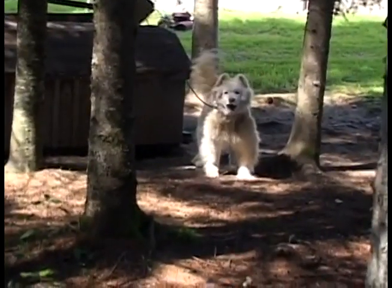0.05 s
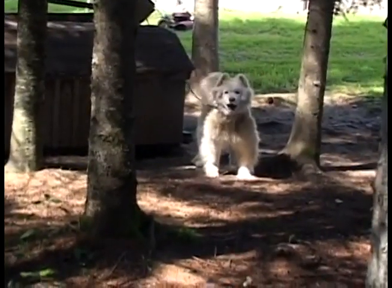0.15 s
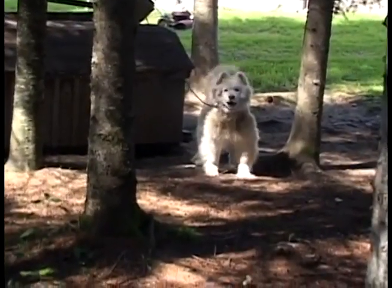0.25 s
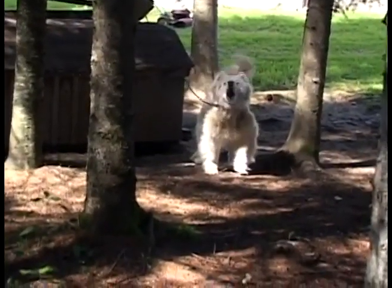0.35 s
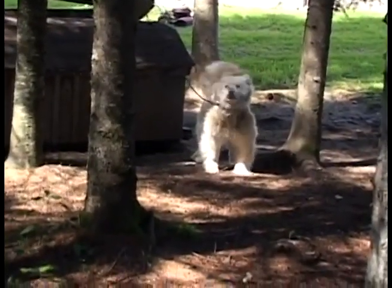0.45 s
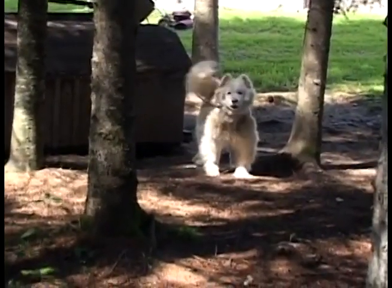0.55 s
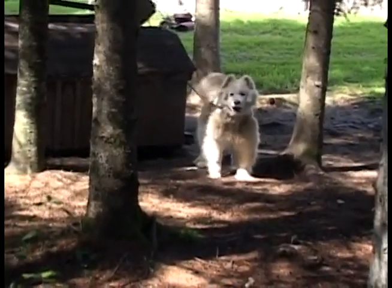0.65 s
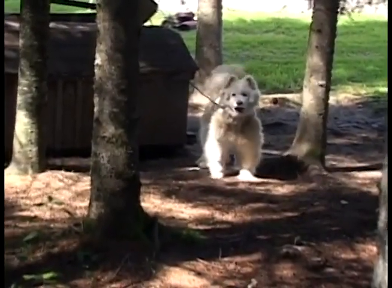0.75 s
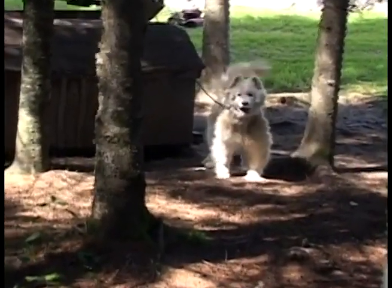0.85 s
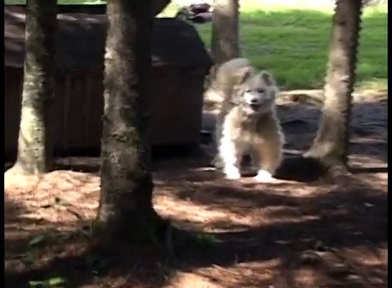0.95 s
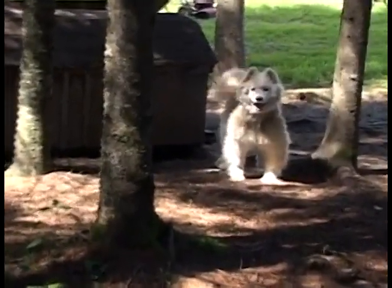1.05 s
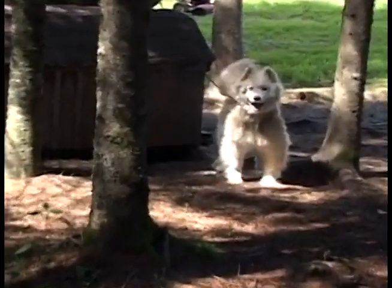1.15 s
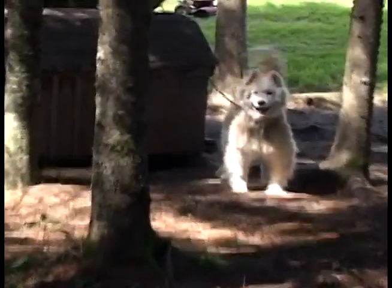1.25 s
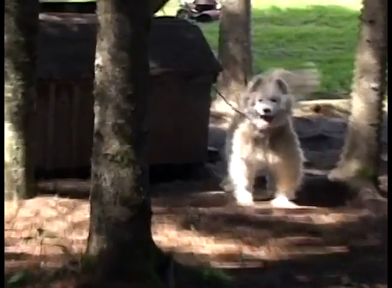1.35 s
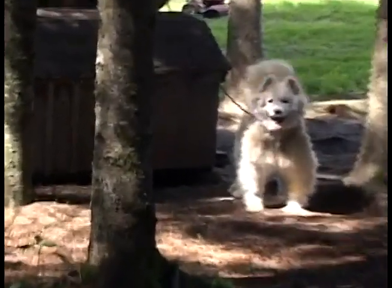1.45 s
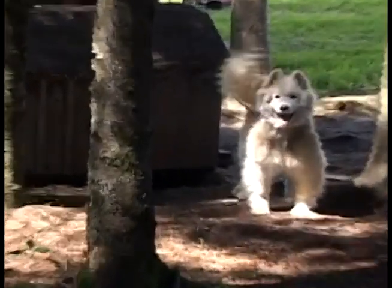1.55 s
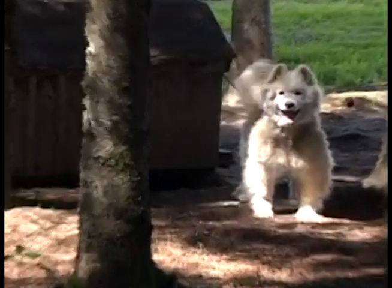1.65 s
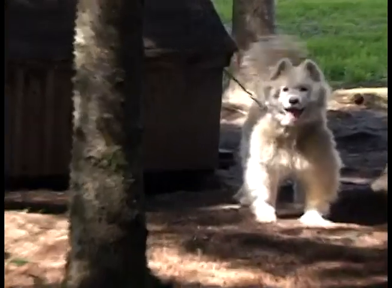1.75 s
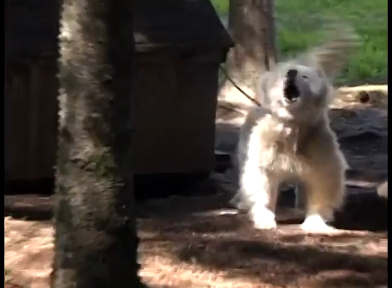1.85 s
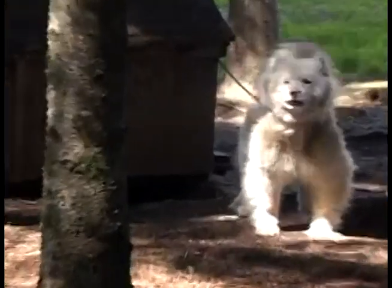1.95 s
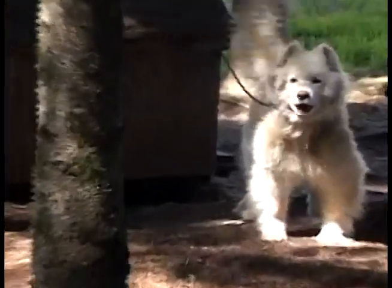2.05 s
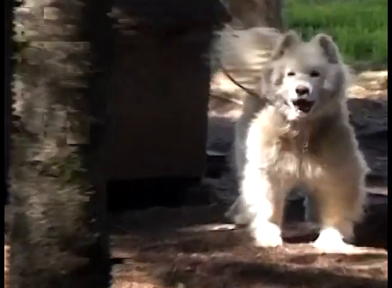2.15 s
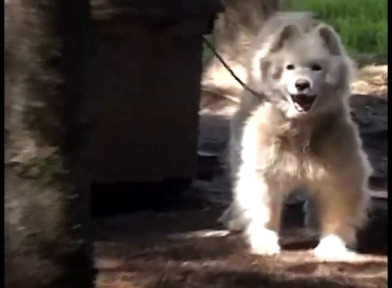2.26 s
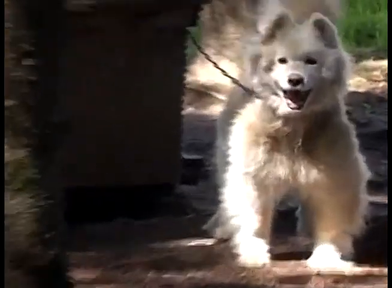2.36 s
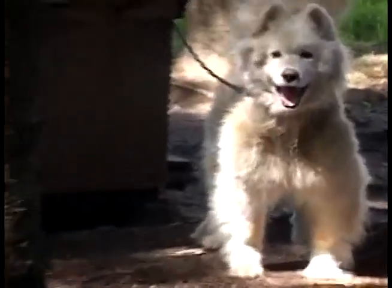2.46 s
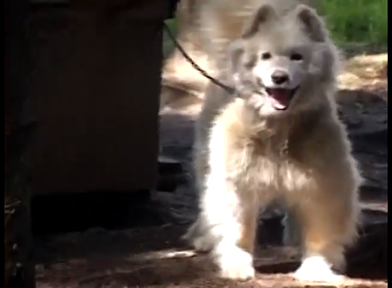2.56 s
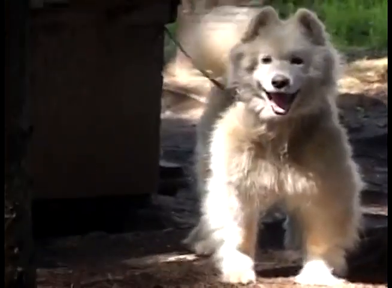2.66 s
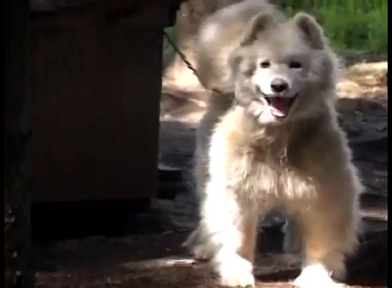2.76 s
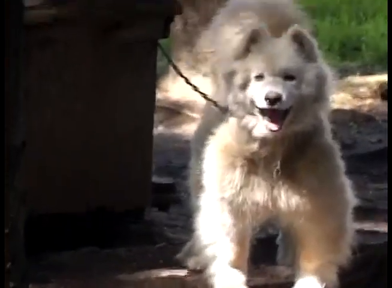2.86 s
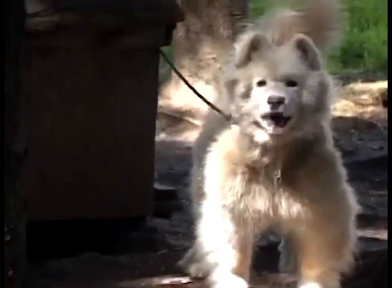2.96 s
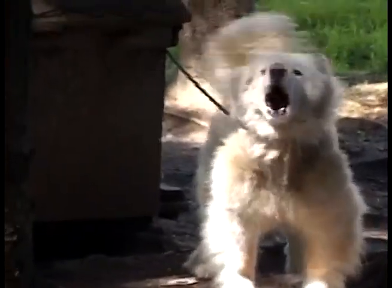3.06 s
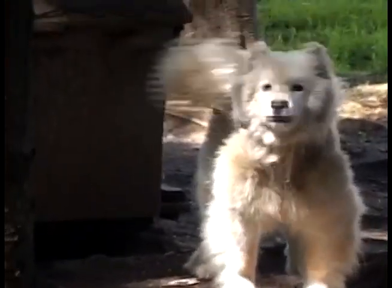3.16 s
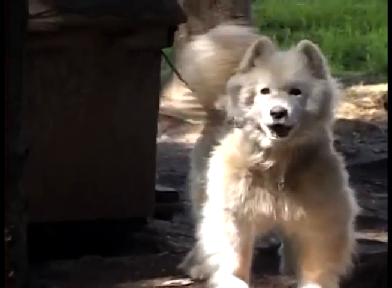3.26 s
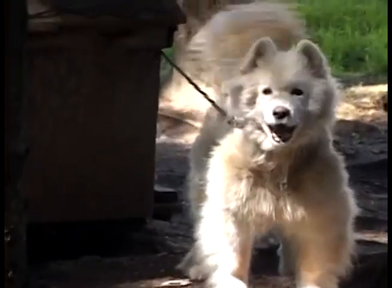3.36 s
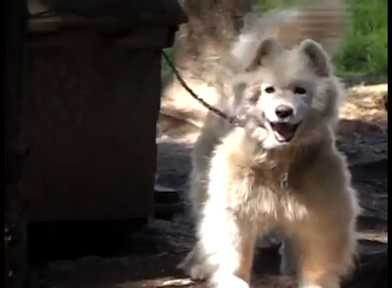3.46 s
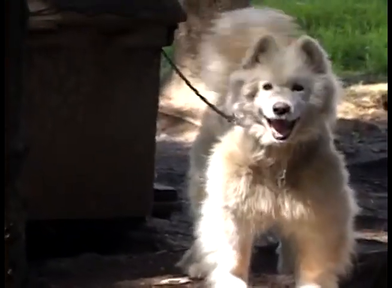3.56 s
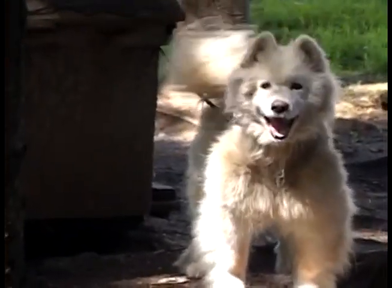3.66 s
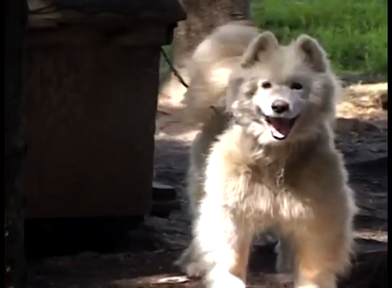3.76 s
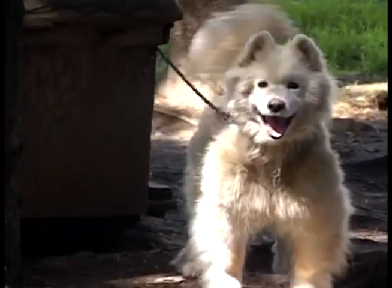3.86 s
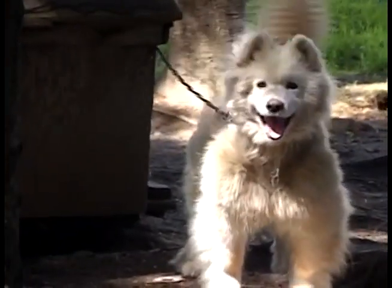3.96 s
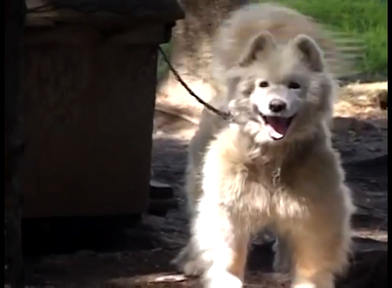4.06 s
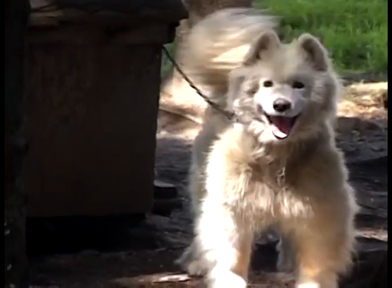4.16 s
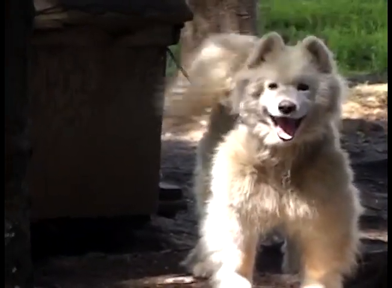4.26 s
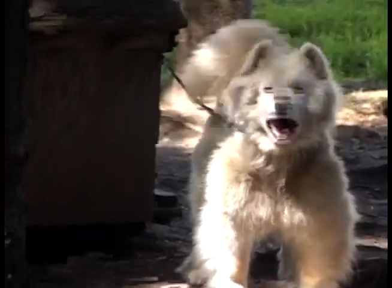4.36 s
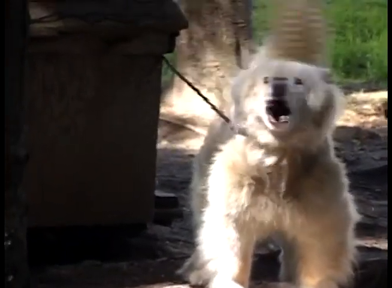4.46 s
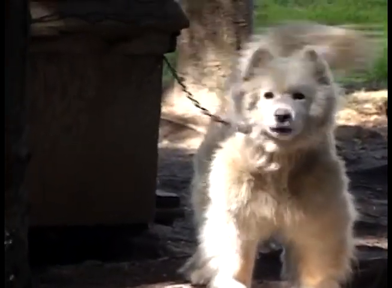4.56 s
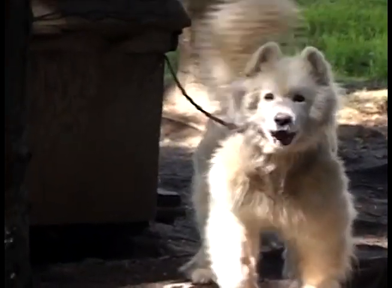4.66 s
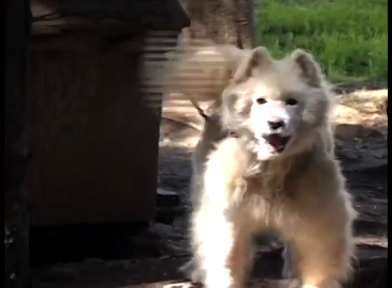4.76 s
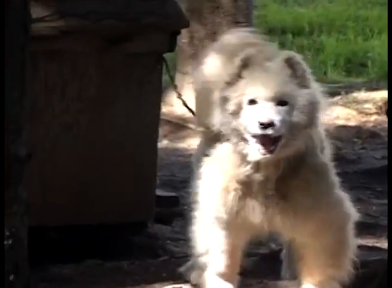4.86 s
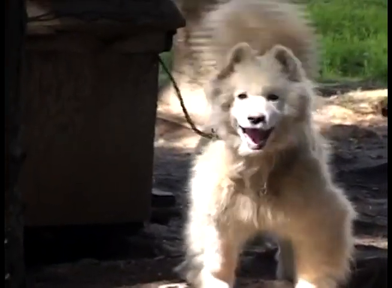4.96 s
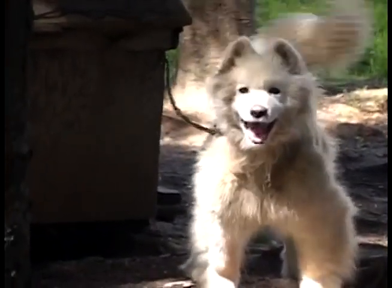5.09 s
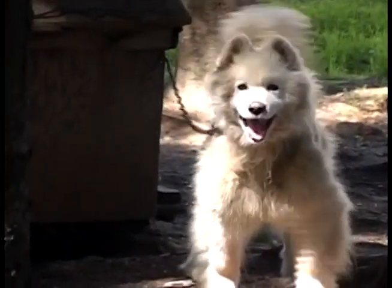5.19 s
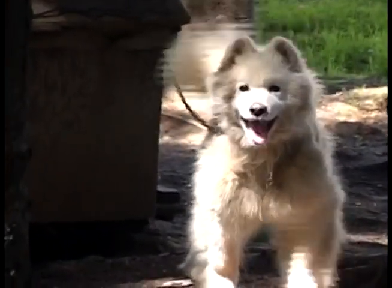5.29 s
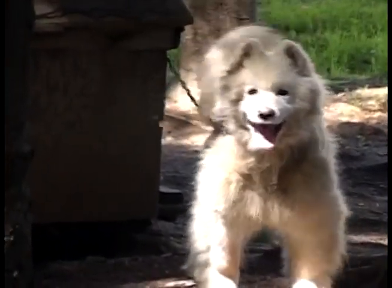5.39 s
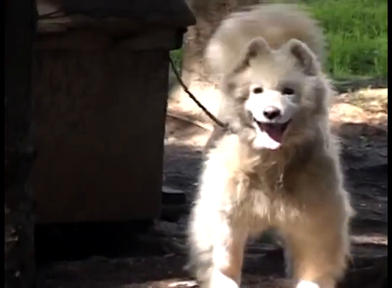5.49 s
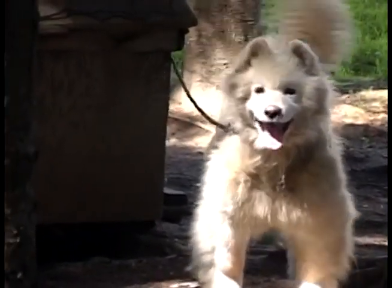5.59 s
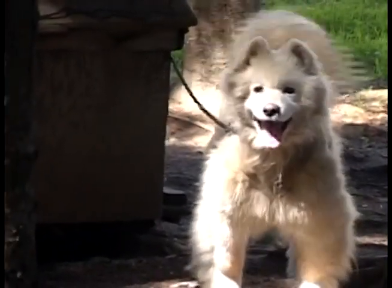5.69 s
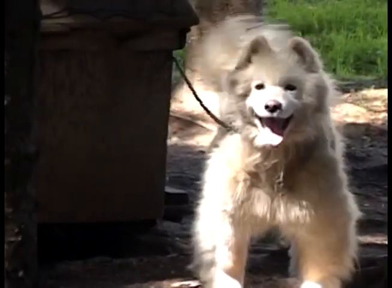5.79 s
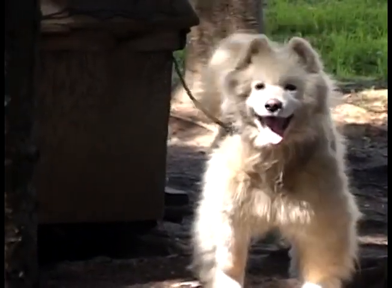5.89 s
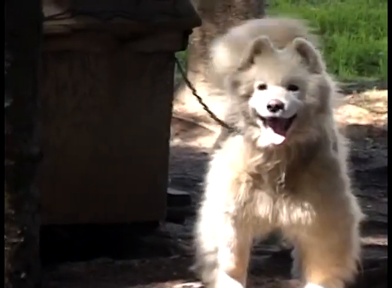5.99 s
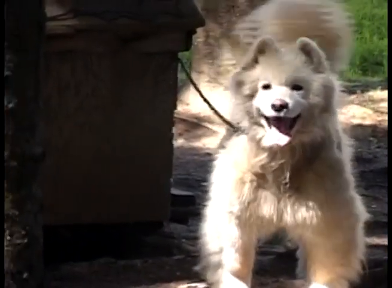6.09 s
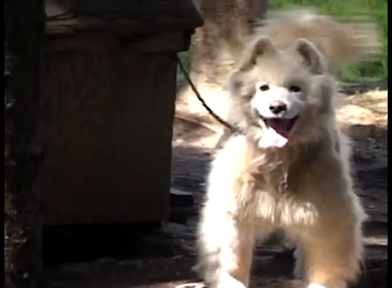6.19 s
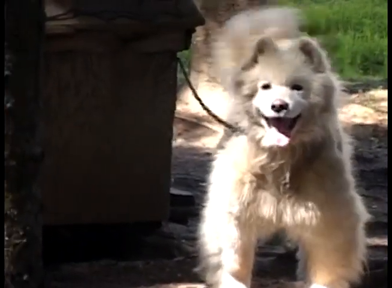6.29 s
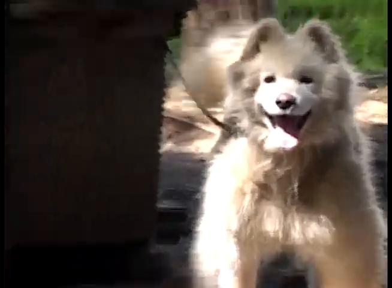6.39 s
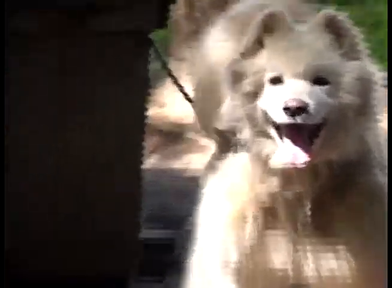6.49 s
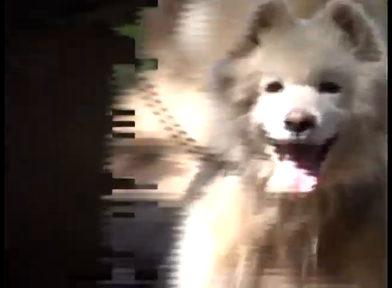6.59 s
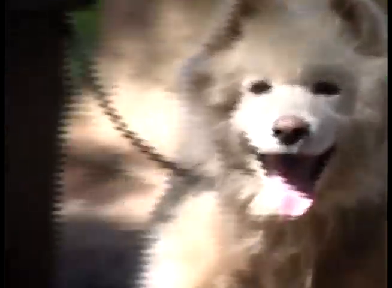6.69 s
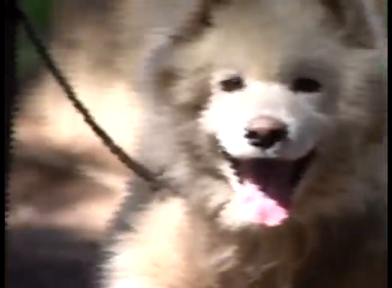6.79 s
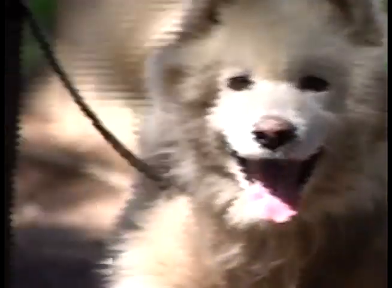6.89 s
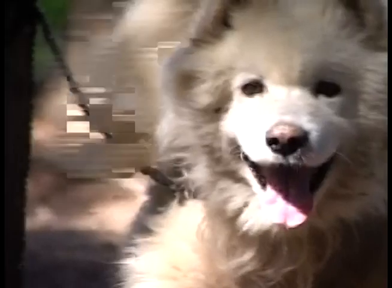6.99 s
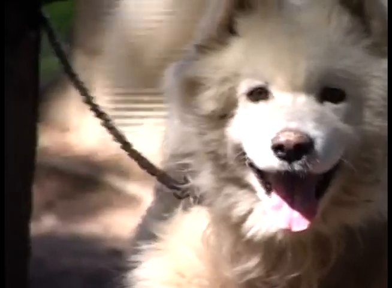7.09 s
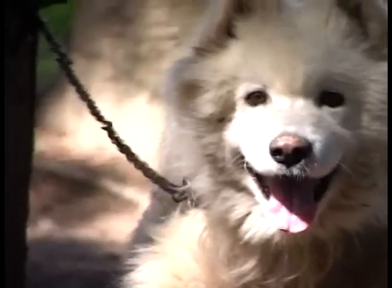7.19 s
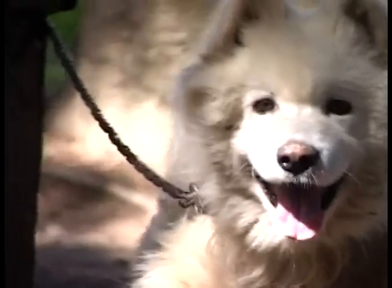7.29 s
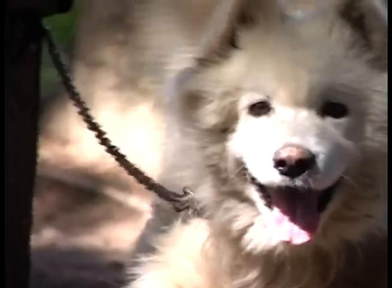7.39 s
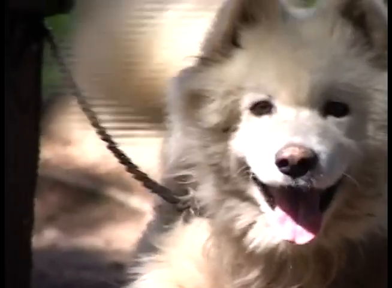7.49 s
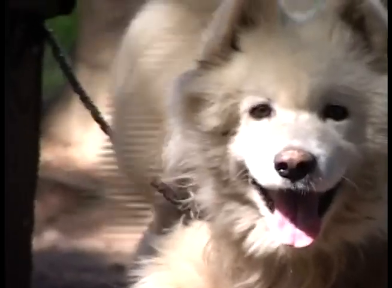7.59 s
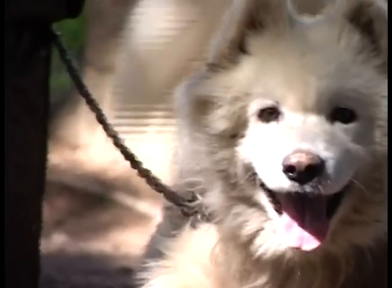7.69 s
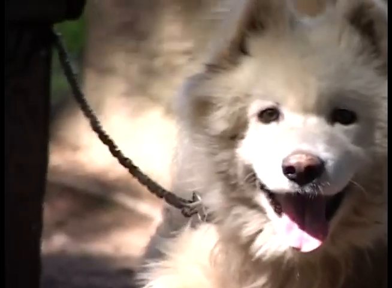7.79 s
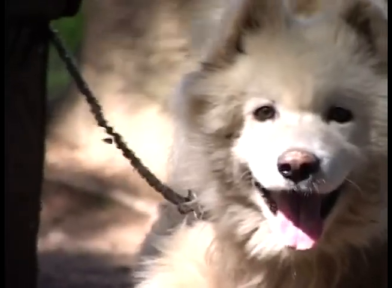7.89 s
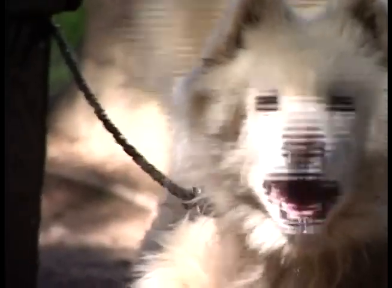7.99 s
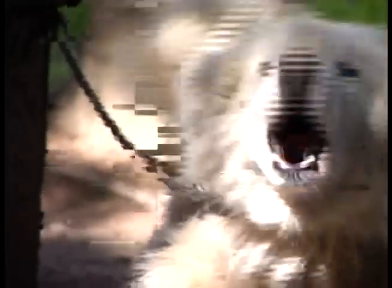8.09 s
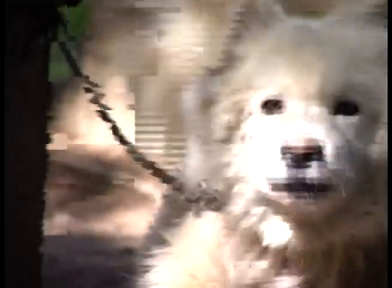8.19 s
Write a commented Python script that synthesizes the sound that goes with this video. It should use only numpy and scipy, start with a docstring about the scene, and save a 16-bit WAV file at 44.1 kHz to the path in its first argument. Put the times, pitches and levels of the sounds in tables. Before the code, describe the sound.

A quiet outdoor yard opens with nearly still air, a faint low hum from a far machine and the dying echo of an earlier bark. Around 0.3 seconds a very faint high swish passes. At 0.4 a large dog barks: short, loud, rough and hoarse, starting with a tiny rush of breath, leaping up in pitch as the jaw opens, then cut off within a fraction of a second. Similar single barks follow at about 1.9, 3.1 and 4.5 seconds, slightly varied in pitch and rasp. Close walls colour each one, and yard and trees return a short scattered tail. From about 5 to 8 seconds only air and hum remain, until a fifth, brighter bark at 8.1 ends the scene. The single microphone is on the left, with soft low thumps under loud peaks; the right holds only faint hiss.

```python
"""Nearly still air, a far machine's hum and the dying echo of an earlier bark open the scene; a faint swish passes.
A large dog then barks four times over some four seconds, and a fifth time after a longer pause, in a yard.
Each bark is a rough voice: uneven pulses, gated noise and a tone, shaped by a jaw that opens and a leap in pitch.
Close walls comb the voice, and yard and trees answer with scattered tails of noise.
One microphone feeds the left channel through a limiter that thumps softly on loud peaks; both channels hiss."""
import sys
import numpy as np
from scipy import signal
from scipy.fft import rfft, irfft, next_fast_len
from scipy.io import wavfile
from scipy.ndimage import uniform_filter1d, minimum_filter1d, map_coordinates

SR = 44100
rng = np.random.default_rng(int(sys.argv[2]) if len(sys.argv) > 2 else 0)


def int16_out(signal):
    """Quantize to a 16-bit WAV file."""
    q = np.round(np.clip(np.atleast_2d(signal).T, -1, 1) * 32767)
    wavfile.write(sys.argv[1], SR, q.astype(np.int16))


N = 363384

# The barks, all times but the first counted from the bark's start:
# (start [s], length [s], attack [s], level [dB], brightness trim [dB], rasp trim [dB],
#  mouth widest [s], gape [1 = usual], starting pitch [Hz], its glide [Hz/s], leap up [s],
#  top pitch [Hz], its glide [Hz/s], drop back [s], basic roughness [0-1])
BARK_LIST = [ (0.420, 0.12, 0.035, -18, 1, 2, 0.1, 0.95, 265.3, 850, .071, 452.4, 500, .16, .4),
             (1.899, 0.12, 0.029, -16, -0.5, -.3, 0.085, 0.89, 308.2, 249.5, 0.08, 468.6, -43.5, .109, .64),
             (3.083, 0.13, 0.045, -16.5, 1, -0.9, 0.09, 0.93, 288.1, 121.5, .075, 496.8, -450, .117, 0.54),
             (4.467, 0.12, .023, -16, 0.2, 0.3, 0.082, 1.1, 377.8, -800, 0.049, 501.3, -750, .128, .4),
             (8.105, 0.11, 0.029, -16, 1.9, -1, .097, 1.2, 382.6, -900, .057, 511.2, -550, 0.16, .46), ]
# Broad slope of throat and muzzle: (frequency [Hz], level [dB])
THROAT_SLOPE = [(100, -30), (290, -39), (400, -13.5), (520, 0), (900, 5.5), (1200, -2.5), (1750, -13.5),
                (2150, -18), (2850, -18.5), (3050, -29.5), (5000, -37), (7000, -46.5), (12000, -50.5),
                (15500, -56)]
# Resonances of throat and muzzle: (centre [Hz], width [Hz], level [dB])
THROAT_RESONANCES = [(595, 32, 5), (726, 70, 0.67), (1010, 125, 6.5), (1660, 300, 4.6), (2460, 700, 5.9)]
# Dips from the bounce off the ground: (centre [Hz], width [Hz], level [dB])
GROUND_DIPS = [(775, 40, -9.5), (1187, 41, -6)]
# Resonances added with the jaw nearly shut: (centre [Hz], width [Hz], level [dB])
SHUT_RESONANCES = [(1248, 72, 9.5), (2000, 296, 7.5), (3390, 340, 5), (6430, 260, 13), (8300, 600, 4)]
# Resonances added with the jaw wide open: (centre [Hz], width [Hz], level [dB])
OPEN_RESONANCES = [(1546, 250, 8), (3400, 350, -3.5), (4110, 450, 12), (4600, 500, -4), (6250, 1900, 8.5)]
# Reflections off kennel and trunks: (delay [s], gain [factor])
WALL_REFLECTIONS = [(.00313, 0.04), (.0083, -0.011), (.0086, -0.29), (.0095, 0.024), (.0105, .15),
                    (.014, -0.044)]
# Decay of the near echoes: (frequency [Hz], time to fall 60 dB [s])
YARD_DECAY = [(100, 0.56), (550, 0.46), (820, 0.3), (950, 0.42), (1080, 0.34), (1550, 0.34), (2500, 0.29),
              (5000, 0.35), (12000, 0.17)]
# Decay of the far echoes: (frequency [Hz], time to fall 60 dB [s])
TREE_DECAY = [(100, .5), (600, 2.4), (1000, 2.05), (2500, 3.1), (6000, 0.58), (12000, 0.12)]
# Spectrum of the outdoor air, before its overall level: (frequency [Hz], density [dB per Hz])
AIR_SPECTRUM = [(25, -28), (50, -18), (80, -15), (170, -3), (310, -7), (400, 5), (480, -2.5), (1000, -0.5),
                (1350, -2), (1450, -6.5), (1800, -11), (2700, -11.5), (4500, -18), (8000, -35.5),
                (15000, -49)]
# Lines of the far machine, before its overall level: (frequency [Hz], level [dB])
HUM_LINES = [(80.7, -78), (150.7, -62.5), (236.9, -67.5), (425.3, -69), (726.7, -67), (861.3, -67.5),
             (1152, -68)]
# Microphone colour: (centre [Hz], width [Hz], level [dB])
MICROPHONE_COLOUR = [(2499, 100, 7), (5096, 510, -2), (6030, 790, 6.5), (7000, 680, -2.5), (7880, 440, 5.5),
                     (8860, 630, -4), (9600, 680, 6), (11430, 560, 7)]

# Effort: a rush of air leads in, the voice catches, swells, sags and is let go
LEAD_S, LEAD_DB, CATCH_S, CATCH_DB = 0.030, -27.5, 0.009, -12
SAG_DB_PER_S, RELEASE_DB_PER_S, RELEASE_S = 27.5, 423, 0.032
RASP_FOLLOWS = 0.54  # dB of rasp per dB of effort
# The gape moves the energy upwards, and a wider mouth leaves less depth
GAPE_WIDTH_S, GAPE_LOW_DB, GAPE_VOWEL_DB, GAPE_BRIGHT_DB = 0.041, 0.5, 14.5, 4
DEPTH_HZ, DEPTH_DB_PER_GAPE = 570, -16
# The airflow peaks before the mouth is widest
RUSH_AT_S, RUSH_WIDTH_S, RUSH_RASP_DB = 0.073, 0.055, 5
# The closing mouth dulls the end of the bark
CLOSING_LOW_DB_PER_S, CLOSING_BRIGHT_DB_PER_S = 122, -73
# The folds are rougher before they catch and around the leap, clearer in the high register
LEAD_ROUGH, LEAP_ROUGH, LEAP_ROUGH_S, TOP_ROUGH = 0.3, 0.33, 0.014, -0.079
# A change of register takes a moment; the low register sinks after the drop
LEAP_S, DROP_HZ, SINK_HZ_PER_S = 0.014, 299.45, 600


def dog(low_db, mouth_db, bright_db, rasp_db, open_s, close_s):
    """Voice through throat and walls; the push and the gape balance its four frequency bands."""
    t = np.arange(N) / SR
    folds = larynx(jitter=0.05175, shimmer_db=7.5, flutter_db=1.5, tone_db=-13.5)
    voice = throat(folds, jaw_delay_s=0.013, jaw_s=0.08)
    # close surfaces comb the voice
    voice = voice + sum(gain * np.interp(t - delay, t, voice) for delay, gain in WALL_REFLECTIONS)
    sounding, level, depth, chest, mouth, bright, rasp = gesture(open_s, close_s)

    def below(edge_hz):
        return filtered(voice, lambda hz: 1 / (1 + (hz / edge_hz) ** 24))

    low, vowel, body = below(805), below(1111), below(3105)
    deep = (amp(depth) - 1) * below(DEPTH_HZ)
    parts = [
        (low + deep, chest + low_db),
        (vowel - low, mouth + mouth_db),
        (body - vowel, bright + bright_db),
        (voice - body, rasp + rasp_db + 1.8 * wobble(55)),
    ]
    balanced = sum(amp(db) * steady(part, 0.026) for part, db in parts)
    return sounding * amp(level) * balanced


def larynx(jitter, shimmer_db, flutter_db, tone_db):
    """Uneven puffs of the vocal folds, a clear tone where they swing evenly, turbulence pulsing with each cycle."""
    pitch, rough = registers()
    rough = np.clip(rough, 0.02, 0.95)
    cycles = np.cumsum(pitch * (1 + jitter * rough * wobble(350))) / SR
    phase = 2 * np.pi * cycles
    new_cycle = np.diff(np.floor(cycles), prepend=0)
    pulses = unit(new_cycle * amp(shimmer_db * wobble(300)))
    turbulence = unit(rng.standard_normal(N) * (1 + 0.88 * np.cos(phase)))
    # the folds close softly, so the treble is mostly turbulence
    tonal = lambda hz: 1 / (1 + (hz / 2200) ** 2)
    voiced = filtered(pulses, tonal) + filtered(turbulence, lambda hz: 1 - tonal(hz))
    # the second harmonic carries the clear part of the bark
    tone = amp(tone_db) * (1 - rough) * np.cos(2 * phase)
    hoarse = np.sqrt(1 - rough) * voiced + np.sqrt(rough) * turbulence
    return hoarse * amp(flutter_db * wobble(190)) + tone


def registers():
    """Pitch [Hz] and roughness: folds start low, break roughly into a high register, drop back as the push fades."""
    age, *_, start_hz, start_glide, leap_s, top_hz, top_glide, drop_s, rough = bark_clock()
    low = start_hz + start_glide * age
    high = top_hz + top_glide * (age - leap_s)
    sinking = np.maximum(DROP_HZ - SINK_HZ_PER_S * (age - drop_s), DROP_HZ / 2)
    up = ramp((age - leap_s) / LEAP_S + 0.5)
    down = ramp((age - drop_s) / LEAP_S + 0.5)
    pitch = (1 - down) * ((1 - up) * low + up * high) + down * sinking
    rough = rough + LEAD_ROUGH * ramp(-age / CATCH_S)
    rough = rough + TOP_ROUGH * (up - down)
    rough = rough + LEAP_ROUGH * swell(age - leap_s, LEAP_ROUGH_S)
    return pitch, rough


def throat(source, jaw_delay_s, jaw_s):
    """The jaw drops early in every bark, fading from shut to open resonances; tongue and lips keep them restless."""
    age, *_ = bark_clock()
    jaw = ramp((age - jaw_delay_s) / jaw_s)

    def through(muzzle):
        resonances = THROAT_RESONANCES + GROUND_DIPS + muzzle
        return coloured(source, lambda hz: along(THROAT_SLOPE, hz) + bumps(resonances, hz))

    return patchy((1 - jaw) * through(SHUT_RESONANCES) + jaw * through(OPEN_RESONANCES), depth_db=3.5)


def gesture(open_s, close_s):
    """One push and one gape a bark: airway 0-1, bark dB, then dB of depth, lows, vowel, brightness and rasp."""
    age, length, attack, level_db, bright_db, rasp_db, gape_s, gape_size, *_ = bark_clock()
    opening = ramp((age + LEAD_S) / open_s)
    sounding = opening * np.exp(-np.maximum(age - length - RELEASE_S, 0) / close_s)
    rise = (LEAD_DB - CATCH_DB) * ramp(-age / CATCH_S) + CATCH_DB * ramp(1 - age / attack)
    closing = np.maximum(age - length, 0)
    effort = rise - SAG_DB_PER_S * np.maximum(age - attack, 0) - RELEASE_DB_PER_S * closing
    gape = gape_size * swell(age - gape_s, GAPE_WIDTH_S)
    rush = swell(age - RUSH_AT_S, RUSH_WIDTH_S)
    depth = DEPTH_DB_PER_GAPE * (gape_size - 1)
    lows = effort + GAPE_LOW_DB * gape + CLOSING_LOW_DB_PER_S * closing
    vowel = effort + GAPE_VOWEL_DB * gape
    bright = effort + GAPE_BRIGHT_DB * gape + CLOSING_BRIGHT_DB_PER_S * closing + bright_db
    rasp = RASP_FOLLOWS * effort + RUSH_RASP_DB * rush + rasp_db
    return sounding, level_db, depth, lows, vowel, bright, rasp


def bark_clock():
    """Per sample: time since the current bark's start (negative in its lead-in), then that bark's other columns."""
    t, rows = np.arange(N) / SR, np.array(BARK_LIST)
    current = np.maximum(np.searchsorted(rows[:, 0] - 2 * LEAD_S, t) - 1, 0)
    start, *columns = rows[current].T
    return t - start, *columns


def echoes(x, decay, delay_s):
    """A scattered tail of noise in which each frequency dies at its own speed."""
    hz, t, z = signal.stft(rng.standard_normal(SR), SR, nperseg=256)
    fading = z * amp(-60 * t / along(decay, hz)[:, None])
    tail = signal.istft(fading, SR, nperseg=256)[1]
    delayed = np.pad(x, (int(delay_s * SR), 0))
    return signal.fftconvolve(delayed, tail / np.linalg.norm(tail))[:N]


def lingering(level_db, t60):
    """The far echo of an earlier bark: throat-coloured noise, still dying away."""
    colour = lambda hz: amp(along(THROAT_SLOPE, hz) + bumps(THROAT_RESONANCES + GROUND_DIPS, hz))
    wash = unit(filtered(rng.standard_normal(N), colour))
    return wash * amp(level_db - 60 * np.arange(N) / SR / t60)


def swish(at_s, length_s, centre_hz, width_hz, level_db):
    """A brief, faint high swish before the first bark: a band of noise that swells and fades."""
    band = unit(filtered(rng.standard_normal(N), lambda hz: swell(hz - centre_hz, width_hz)))
    return band * amp(level_db) * swell(np.arange(N) / SR - at_s, length_s)


def background(air_db, hum_db, drift_hz):
    """Nearly still outdoor air as coloured noise, and a far machine's hum as slightly unsteady sines."""
    t = np.arange(N) / SR
    stir_db = 0.2 * wobble(1.5) + 0.45 * wobble(9)
    air = unit(filtered(rng.standard_normal(N), lambda hz: amp(along(AIR_SPECTRUM, hz))))
    hum = np.zeros(N)
    for hz, db in HUM_LINES:
        # the higher a line, the further it wanders
        wander = drift_hz * hz / HUM_LINES[0][0] * np.cumsum(wobble(21)) / SR
        sway_db = 1.1 * wobble(4)
        hum += amp(db + sway_db) * np.sin(2 * np.pi * (hz * t + wander))
    return air * amp(air_db + stir_db) + amp(hum_db) * hum


def amp(db):
    """Decibels to gain."""
    return 10 ** (np.asarray(db) / 20)


def unit(x):
    """x at rms 1."""
    return x / np.sqrt(np.mean(x ** 2) + 1e-20)


def steady(x, seconds):
    """x held at rms 1 over a sliding window."""
    power = uniform_filter1d(x ** 2, max(1, int(seconds * SR)))
    return x / np.sqrt(np.abs(power) + 1e-20)


def ramp(x):
    """x held between 0 and 1."""
    return np.clip(x, 0, 1)


def swell(x, width):
    """A bell of height 1 around x = 0."""
    return np.exp(-(x / width) ** 2)


def wobble(rate):
    """A smooth random curve, rate knots a second."""
    knots = rng.standard_normal(int(N * rate / SR) + 4)
    return map_coordinates(knots, [np.arange(N) * rate / SR])


def along(points, hz):
    """(Hz, value) points joined on a log frequency axis."""
    f, v = np.transpose(points)
    return np.interp(np.log(hz + 1), np.log(f + 1), v)


def bumps(peaks, hz):
    """The dB curve of (Hz, width, dB) resonances."""
    return sum(db / (1 + (2 * (hz - centre) / width) ** 2) for centre, width, db in peaks)


def filtered(x, response):
    """x times a response of frequency."""
    m = next_fast_len(N + SR // 2)
    return irfft(rfft(x, m) * response(np.fft.rfftfreq(m, 1 / SR)), m)[..., :N]


def coloured(x, curve, size=8192):
    """x through the causal minimum-phase filter with a given dB curve."""
    cepstrum = irfft(np.log(amp(curve(np.fft.rfftfreq(size, 1 / SR)))))
    # fold the cepstrum forward in time
    cepstrum[1:size // 2] *= 2
    cepstrum[size // 2 + 1:] = 0
    return signal.fftconvolve(x, irfft(np.exp(rfft(cepstrum))))[:N]


def patchy(x, depth_db, size=(4, 14)):
    """x with patches of random gain, a few hundred Hz wide and a few hundredths of a second long."""
    z = signal.stft(x, nperseg=512, noverlap=384)[2]
    field = uniform_filter1d(rng.standard_normal(z.shape), size[0], 0)
    field = uniform_filter1d(field, size[1], 1)
    return signal.istft(z * amp(depth_db * np.tanh(unit(field))), nperseg=512, noverlap=384)[1][:N]


def scene():
    """Everything reaches one microphone, on the left channel; the right stays silent."""
    barks = dog(low_db=4.5, mouth_db=-5, bright_db=-2.63, rasp_db=-21.0, open_s=0.0039, close_s=0.016)
    near = amp(-16.0) * echoes(barks, YARD_DECAY, delay_s=0.012)
    far = amp(-36) * echoes(barks, TREE_DECAY, delay_s=0.07)
    earlier = lingering(level_db=-39.5, t60=1.0)
    brush = swish(at_s=0.3, length_s=0.032, centre_hz=5700, width_hz=630, level_db=-59.0)
    bed = background(air_db=-46.5, hum_db=9.0, drift_hz=0.65)
    return np.array([barks + near + far + earlier + brush + bed, np.zeros(N)])


def limiter(x, ceiling, thump_db, knee):
    """Peaks pull the gain down; the control signal of the loud swings leaks in as a low thump."""
    needed = np.minimum(1, ceiling / (np.abs(x) + 1e-9))
    gain = uniform_filter1d(minimum_filter1d(needed, 120), 100)  # windows in samples
    control = np.tanh(np.maximum(np.abs(x) - knee, 0) / knee)
    # one highpass at 14 Hz, lowpasses at 30 and 300 Hz
    leak = filtered(control, lambda hz: 1j * hz / (14 + 1j * hz) / (1 + 1j * hz / 30) / (1 + 1j * hz / 300))
    return x * gain + amp(thump_db) * leak


def record(dry):
    """Microphone colour and limiter on the left, faint hiss on both channels, and a band limit."""
    microphone = coloured(dry[0], lambda hz: bumps(MICROPHONE_COLOUR, hz))
    left = limiter(microphone, ceiling=0.96, thump_db=-8.5, knee=0.51)
    hiss = amp(-73.0) * filtered(rng.standard_normal((2, N)), lambda hz: 1 / (1 + (hz / 13000) ** 6))
    return filtered(np.array([left, dry[1]]) + hiss, lambda hz: hz < 15500)


dry = scene()
out = record(dry)
int16_out(out)
```